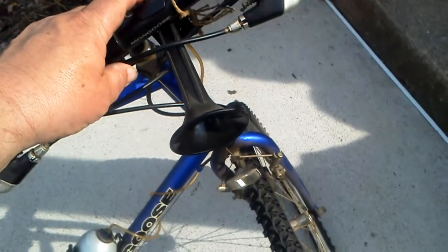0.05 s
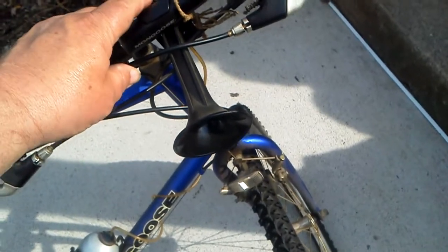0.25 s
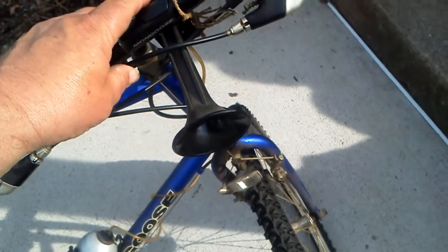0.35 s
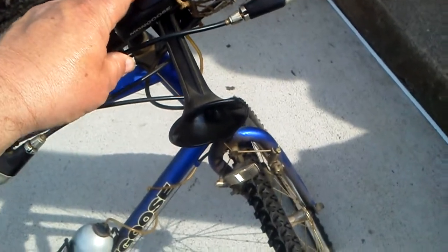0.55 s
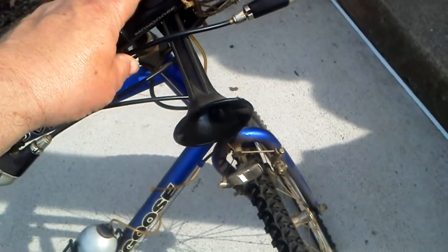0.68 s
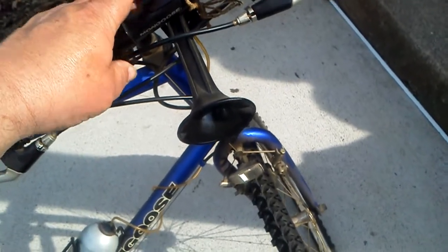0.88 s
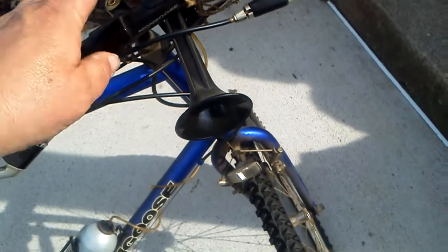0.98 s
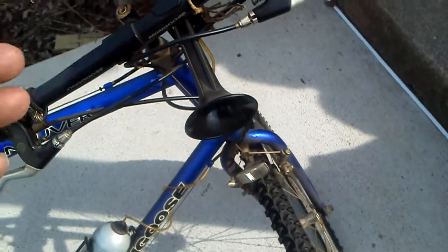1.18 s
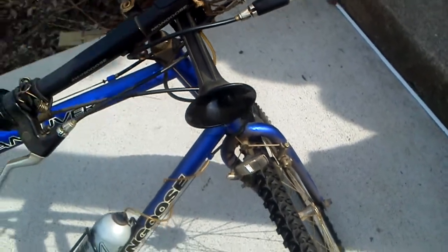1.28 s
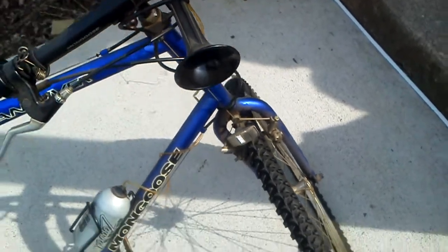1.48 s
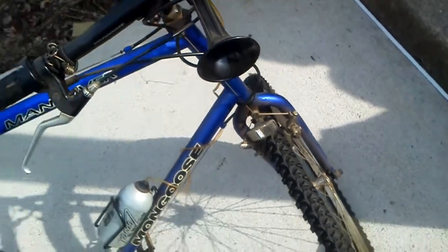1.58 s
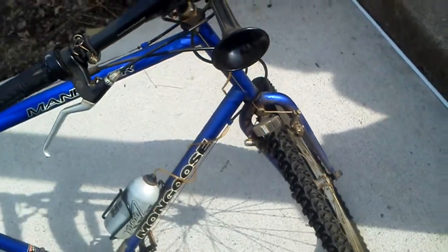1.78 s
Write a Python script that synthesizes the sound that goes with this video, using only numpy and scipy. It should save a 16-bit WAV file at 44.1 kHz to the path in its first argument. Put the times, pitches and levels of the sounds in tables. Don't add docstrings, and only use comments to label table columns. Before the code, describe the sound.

A loud bicycle air horn blasts twice outdoors, harsh and distorted, with echoes off nearby walls.

```python
import sys
import numpy as np
from scipy import signal
from scipy.fft import rfft, irfft, next_fast_len
from scipy.io import wavfile
from scipy.ndimage import map_coordinates

SR = 44100
rng = np.random.default_rng(int(sys.argv[2]) if len(sys.argv) > 2 else 0)


def generate_wav(sig):
    pcm = np.round(np.clip(np.atleast_2d(sig).T, -1, 1) * 32767).astype(np.int16)
    wavfile.write(sys.argv[1], SR, pcm)


def how_loud(loudness_db):
    steps = np.asarray(loudness_db, float) / 20
    return 10 ** steps


N = 81585


def unit(x):
    return x / np.sqrt(np.mean(x ** 2) + 1e-20)


def along(points, hz):
    f, v = np.transpose(points)
    return np.interp(np.log(hz + 1), np.log(f + 1), v)


def wobble(rate_hz):
    knots = rng.standard_normal(int(N * rate_hz / SR) + 4)
    return map_coordinates(knots, [np.arange(N) * rate_hz / SR])


def filtered(x, response):
    m = next_fast_len(N + SR)
    return irfft(rfft(x, m) * response(np.fft.rfftfreq(m, 1 / SR)), m)[:N]


def peaks(resonances):
    def response(f):
        total = 0
        for k, (centre, width, db) in enumerate(resonances):
            damping = 1j * f * width
            total = total + (-1) ** k * how_loud(db) * damping / (centre * centre - f * f + damping)
        return total
    return response


def noise(spectrum):
    return unit(filtered(rng.standard_normal(N), lambda hz: how_loud(along(spectrum, hz))))


# freq_hz [Hz], density_db [dB per Hz]
TRAFFIC_SPECTRUM = [(120, -21.5), (200, -5), (343, -5.5), (504, -5), (619, -6.5), (2150, -13), (3880, -30),
                    (4300, -50.5), (5590, -97.5), (9460, -120)]
# time_s [s], level_db [dB]
VEHICLE_SWELL = [(0, -1), (1.4, 1.5), (1.57, 3), (1.85, 3)]


def traffic():
    swell_db = np.interp(np.arange(N) / SR, *np.transpose(VEHICLE_SWELL))
    waver_db = 1.5 * wobble(4.6) + 0.36 * wobble(25)
    return how_loud(-44 + swell_db + waver_db) * noise(TRAFFIC_SPECTRUM)


# freq_hz [Hz], density_db [dB per Hz]
WIND_SPECTRUM = [(12, -44), (20, -16.5), (43, 2.5), (171, -8.5), (286, -18.5), (350, -34), (460, -61.5),
                 (770, -120)]


def wind():
    gust_db = 2.5 * wobble(18)
    return how_loud(-39.5) * unit(how_loud(gust_db) * noise(WIND_SPECTRUM))


# centre_s [s], level_db [dB], pitch_hz [Hz]
CAMERA_BUMPS = [
    (0.051, -26, 112),
    (1.207, -25.5, 120),
    (1.378, -26, 203.3),
    (1.551, -31.5, 120),
    (1.649, -38, 90),
    (1.762, -23.5, 99),
]


def bumps():
    t = np.arange(N) / SR
    out = np.zeros(N)
    for centre_s, level_db, pitch_hz in CAMERA_BUMPS:
        since = t - centre_s
        swell = np.exp(-(since * pitch_hz / 0.84) ** 2)
        out -= how_loud(level_db) * np.cos(2 * np.pi * pitch_hz * since) * swell
    return out


# centre_hz [Hz], width_hz [Hz], level_db [dB]
GRIT_RESONANCES = [(780, 59, 12), (1580, 300, 2.5), (2250, 400, -0.5), (2850, 760, -5)]


def scuff():
    crackle = how_loud(2.9 * wobble(400)) * rng.standard_normal(N)
    grit = unit(filtered(crackle, peaks(GRIT_RESONANCES)))
    centre_s, length_s = 1.722, 0.029
    swell = np.exp(-((np.arange(N) / SR - centre_s) / length_s) ** 2)
    return how_loud(-39) * swell * grit


# delay_s [s], level_db [dB], tilt_db [dB per octave]
WALL_ECHOES = [(.0442, -35.5, 12.5), (.0769, -38, -8.5), (.0932, -40.5, -8.5), (.1108, -53.5, -4.5),
               (.1296, -46, -5.5), (.1509, -47, -2), (.2213, -55.5, 6), (.2791, -52.5, -4),
               (.3205, -62, -0.5), (.362, -63.5, 3), (.4198, -67, 3.5), (.51, -66, 2)]
# freq_hz [Hz], gain_db [dB]
ECHO_COLOUR = [(800, 0.5), (1600, 0.5), (2400, -2), (3200, -17), (4000, -6)]
# freq_hz [Hz], gain_db [dB]
TAIL_COLOUR = [(800, -4.5), (1600, 0), (2400, 0.5), (3200, -1), (4000, -9)]


def walls(x):
    t = np.arange(SR) / SR
    t60_s = 0.98
    tail = rng.standard_normal(SR) * how_loud(-60 * t / t60_s) * (t > .02)
    scatter = how_loud(-42.5) * signal.fftconvolve(x, tail / np.linalg.norm(tail))[:N]

    def reflections(f):
        octaves = np.log2(np.clip(f, 400, 2400) / 800)
        return sum(how_loud(level_db + tilt_db * octaves) * np.exp(-2j * np.pi * f * delay_s)
                   for delay_s, level_db, tilt_db in WALL_ECHOES)

    echoes = filtered(filtered(x, reflections), lambda hz: how_loud(along(ECHO_COLOUR, hz)))
    return echoes + filtered(scatter, lambda hz: how_loud(along(TAIL_COLOUR, hz)))


# start_s [s], hold_s [s], pitch_hz [Hz], bright_db [dB],
# spread_rad [phase of the overtones, rad per order squared]
HORN_BLASTS = [
    (0.206, .1605, 796.2, 0, -1.12),
    (.647, .167, 795.1, -1.5, -1.48),
]
OVERTONES_DB = [1.5, 0.5, -8, -17, -16]
# centre_hz [Hz], width_hz [Hz], level_db [dB]
BELL_RESONANCES = [(2510, 350, 3.5), (900, 1400, -7)]
HORN_DB = 21


def horn():
    attack_s, bloom_s, bloom_wait_s = 0.014, 0.0074, 0.022
    out, waver_hz = np.zeros(N), 0.39 * wobble(25)
    for start_s, hold_s, pitch_hz, bright_db, spread_rad in HORN_BLASTS:
        t = np.clip(np.arange(N) / SR - start_s, 0, None)
        sounding = t > 0
        after = np.clip(t - hold_s, 0, None)

        sharp_hz = 25 * np.exp(-t / 0.014) + 11 * np.tanh(after / 0.03)
        pitch = pitch_hz + sharp_hz + waver_hz
        phase = 2 * np.pi * np.cumsum(pitch * sounding) / SR

        release_db = -399.5 * after - 2796.5 * after ** 2
        swing = sounding * how_loud(release_db) / (1 + np.exp(6 - 6 * t / attack_s))
        bloom_curve = np.clip((bloom_wait_s - t) / bloom_s * 2, -50, 50)
        bloom = sounding * how_loud(bright_db - 1502 * after) / (1 + np.exp(bloom_curve))

        tone = np.zeros(N)
        for k, level_db in enumerate(OVERTONES_DB, 1):
            pressure = swing if k == 1 else bloom
            tone += pressure * how_loud(level_db) * np.sin(k * phase - spread_rad * k * k)

        puff = how_loud(-15) * sounding * np.exp(-t / 0.036)
        hiss = how_loud(HORN_DB - 26.5) * np.sqrt(swing * (bloom + 0.063 * swing))
        air = unit(filtered(rng.standard_normal(N), peaks(BELL_RESONANCES)))
        out += how_loud(HORN_DB) * tone + (puff + hiss) * air
    return out


def scene():
    blast = horn()
    mono = traffic() + wind() + bumps() + scuff() + walls(blast) + blast
    return np.tile(mono, (2, 1))


def roll_off(x):
    return signal.sosfilt(signal.butter(12, 16500, fs=SR, output="sos"), x)


def record(dry):
    up, down = 69, 380
    rail, second_rail = 1.41, 0.67
    slow = np.clip(signal.resample_poly(dry[0], up, down), -rail, rail)
    smooth = signal.firwin(numtaps=50 * down + 1, cutoff=1 / down, window=("kaiser", 10))
    fast = signal.resample_poly(slow, down, up, window=smooth)[:N]
    clipped = np.clip(fast, -second_rail, second_rail)
    mono = filtered(clipped, lambda hz: hz < 15830)
    return roll_off(np.tile(mono, (2, 1)))


dry = scene()
out = record(dry)
generate_wav(out)
```